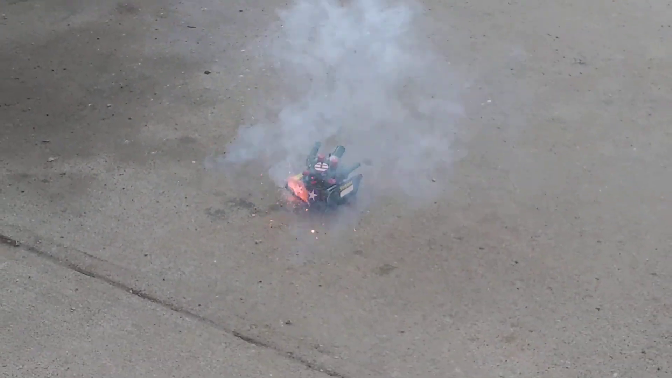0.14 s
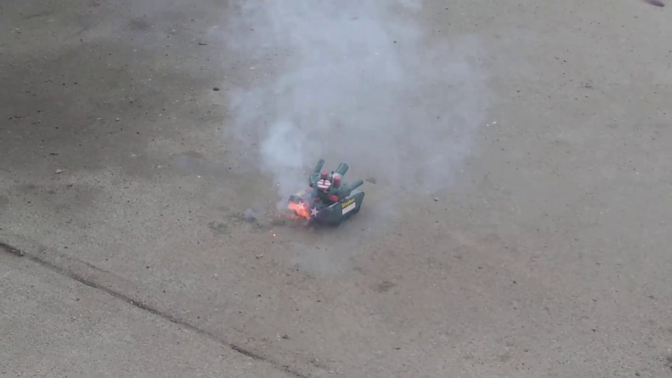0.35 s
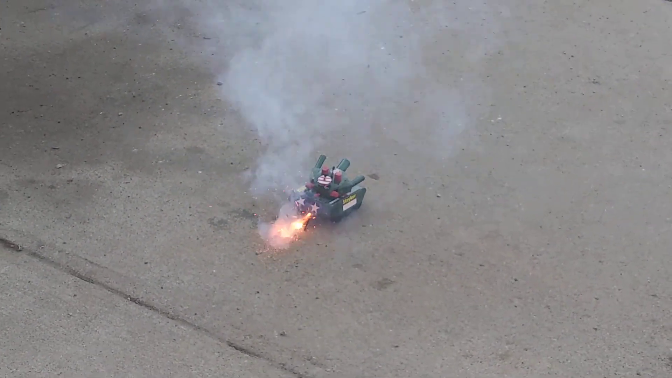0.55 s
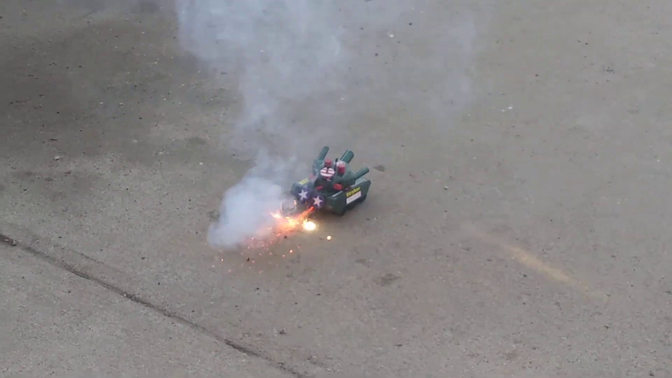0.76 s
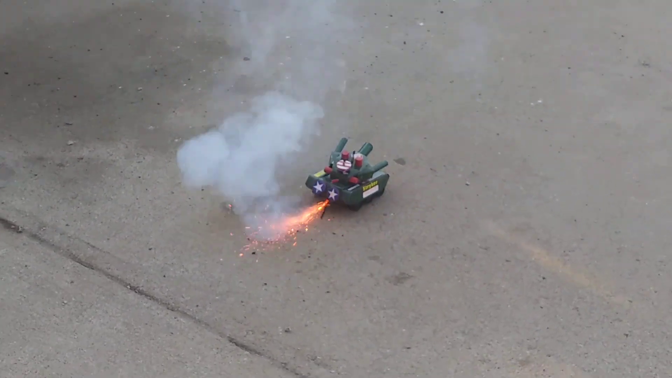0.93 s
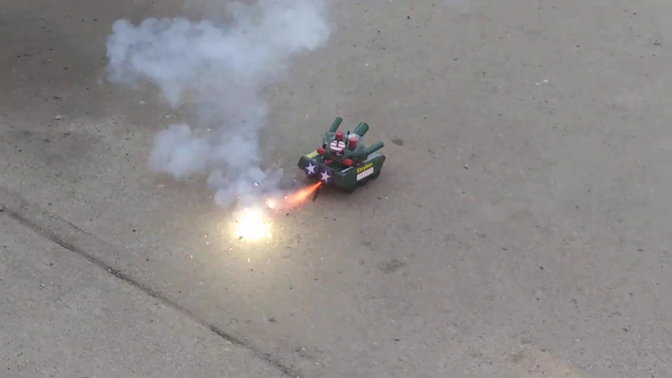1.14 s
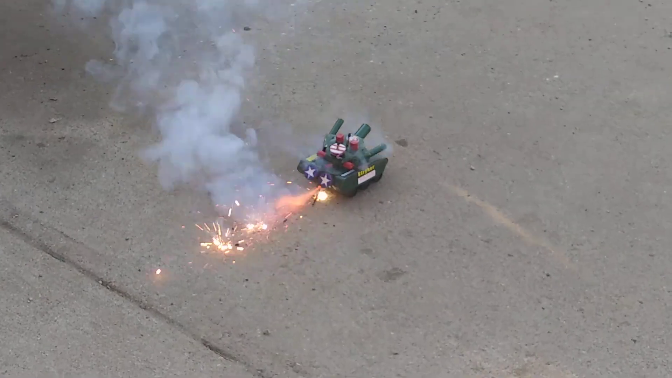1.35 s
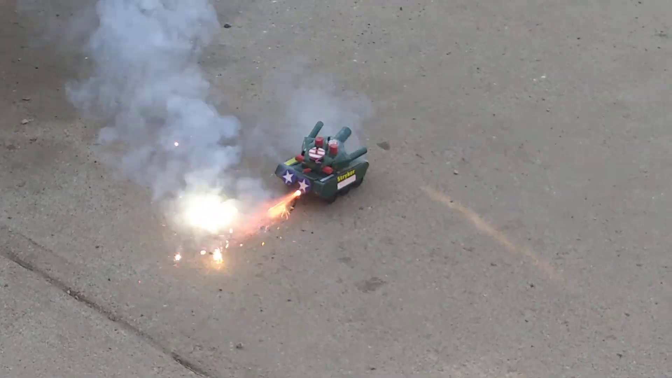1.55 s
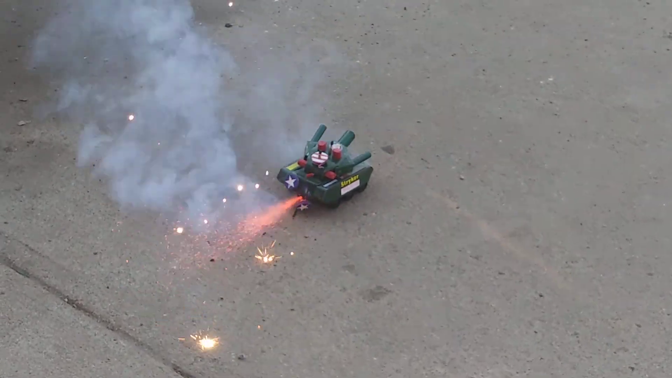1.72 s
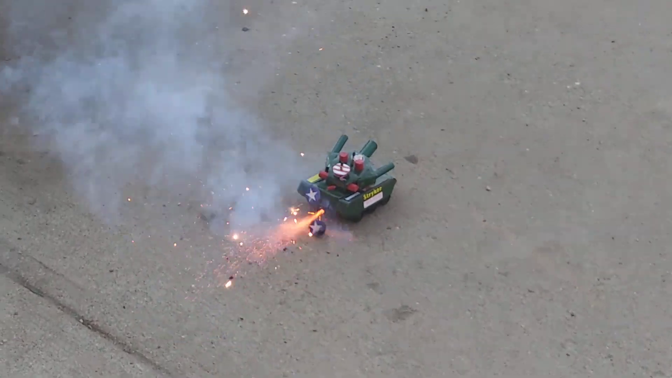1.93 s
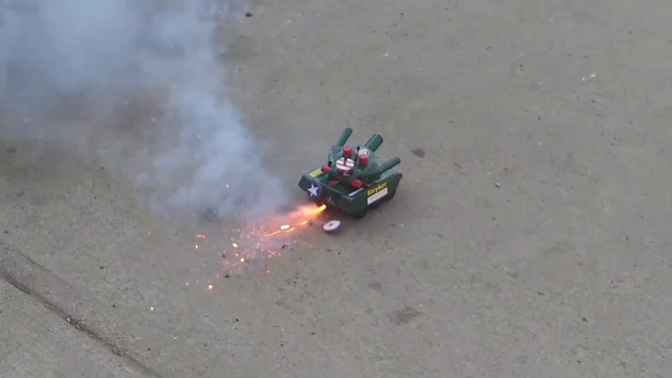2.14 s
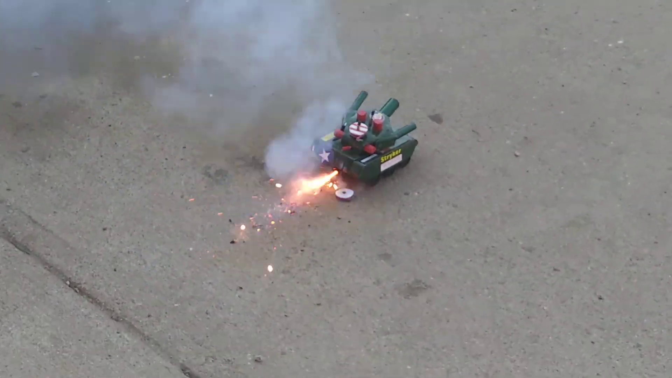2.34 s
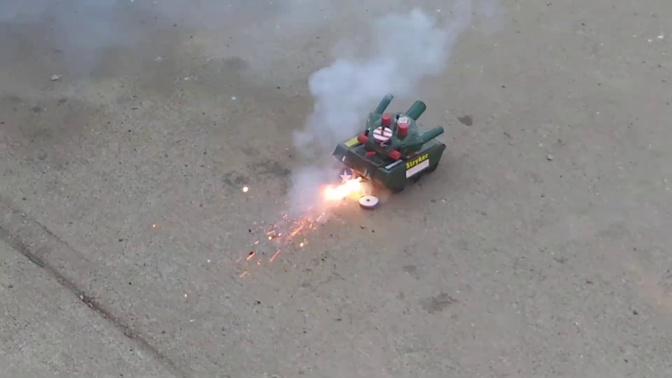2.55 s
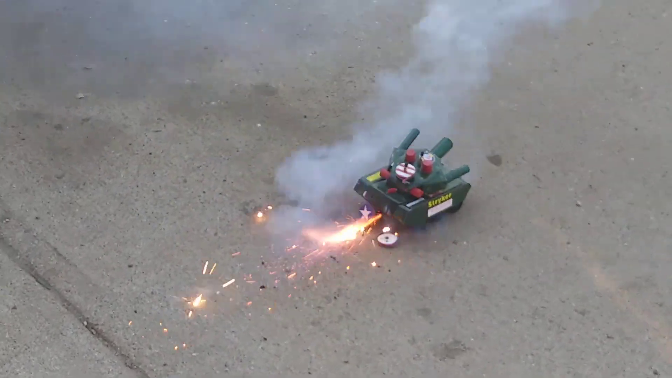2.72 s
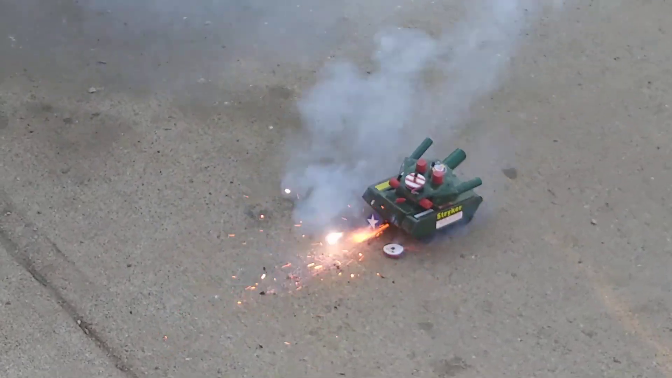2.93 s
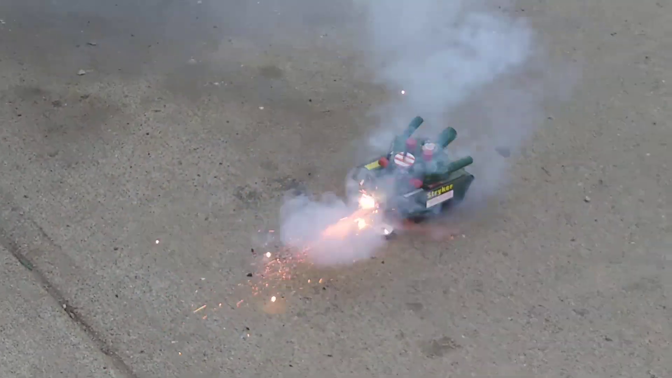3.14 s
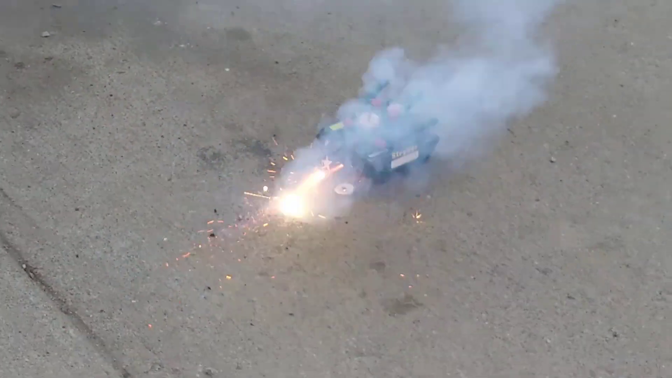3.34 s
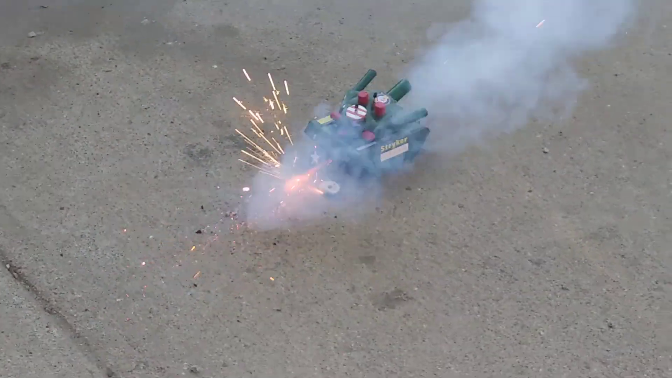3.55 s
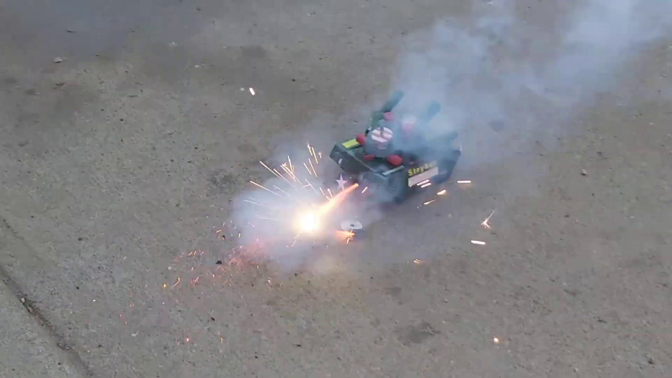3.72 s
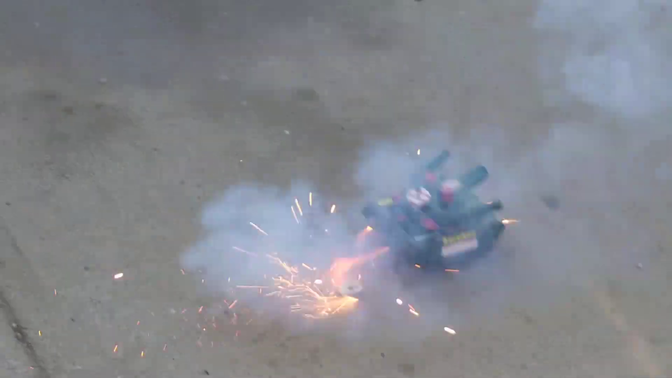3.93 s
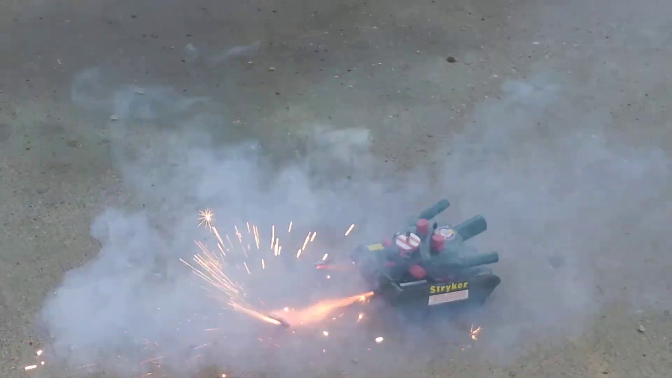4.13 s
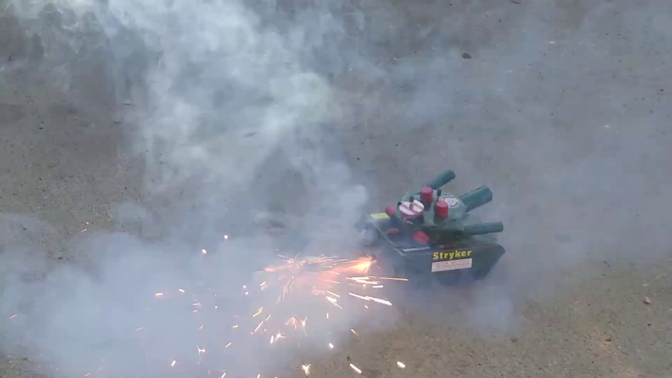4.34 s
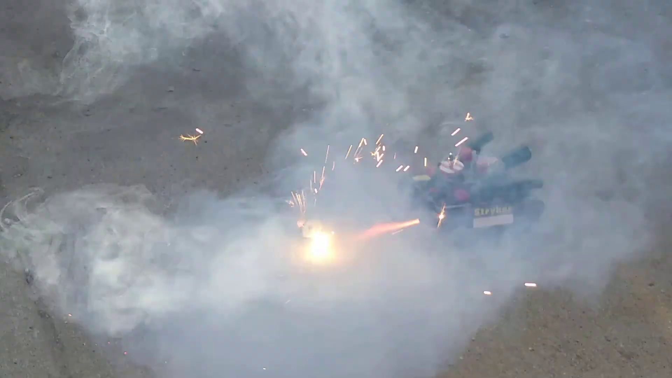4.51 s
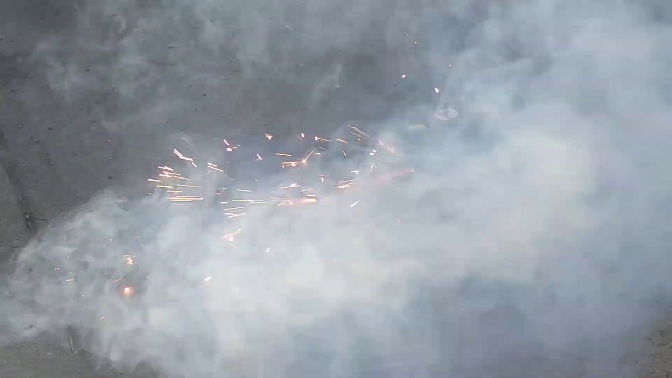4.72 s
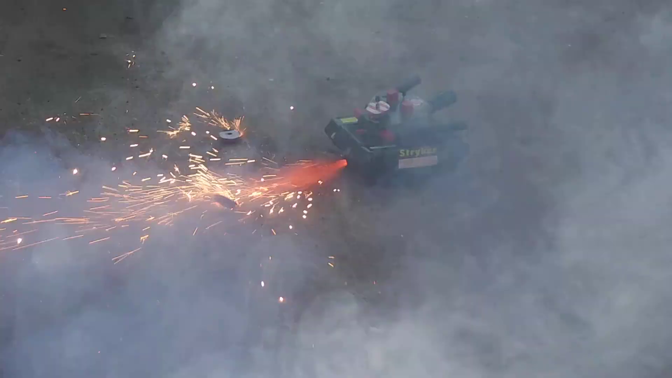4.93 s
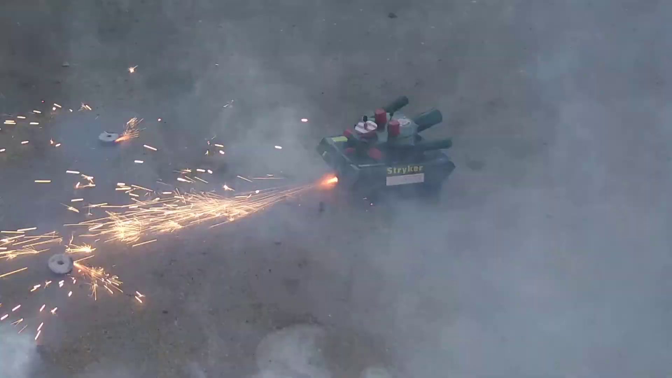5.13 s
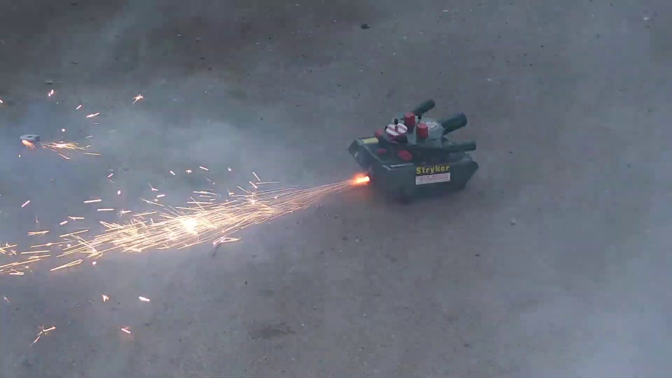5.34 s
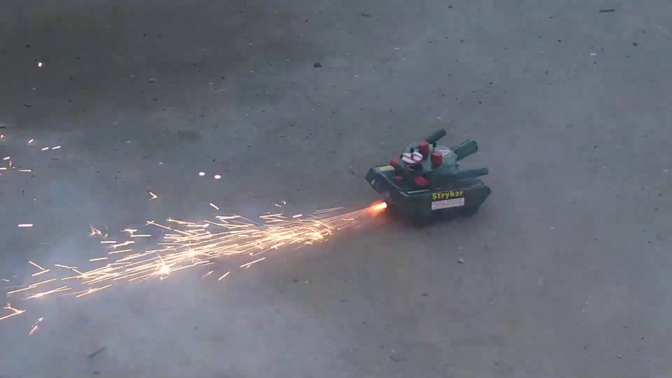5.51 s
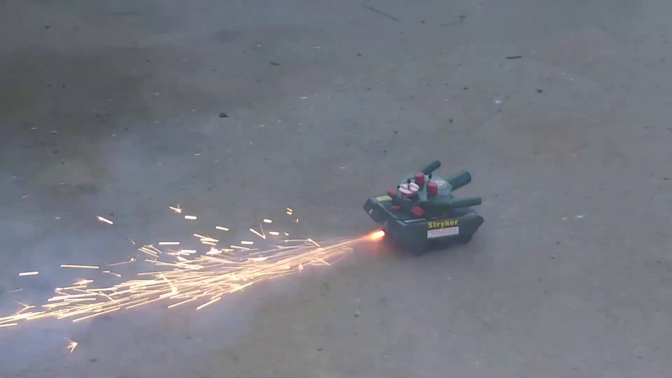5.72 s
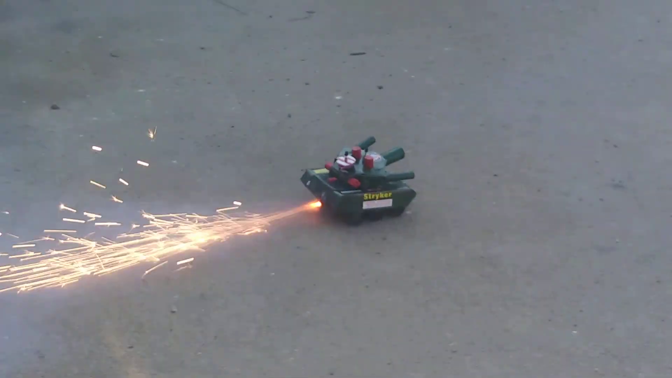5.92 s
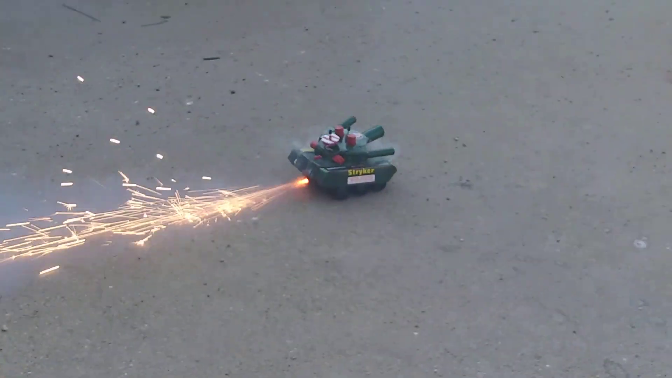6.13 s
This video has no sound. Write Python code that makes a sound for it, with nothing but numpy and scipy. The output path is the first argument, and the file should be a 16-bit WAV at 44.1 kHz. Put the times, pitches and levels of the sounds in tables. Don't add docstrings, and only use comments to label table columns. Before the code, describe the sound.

Outdoors on concrete, burning powder hisses softly and roughly, flickering and ticking with small pops. The flame gets steadily louder and fuller, with dull snaps trailing short hisses. Then a very loud high whistle takes over abruptly, wavering and breaking at first, then raspy and gradually falling in pitch above a sizzling jet, still sounding at the end. One dry handheld microphone, slightly distorted, without echo.

```python
import sys
import numpy as np
from scipy import signal
from scipy.fft import rfft, irfft, next_fast_len
from scipy.io import wavfile
from scipy.ndimage import uniform_filter1d

SR = 44100
rng = np.random.default_rng(int(sys.argv[2]) if len(sys.argv) > 2 else 0)


def output_pcm(signal):
    pcm = np.clip(np.atleast_2d(signal).T, -1, 1) * 32767
    wavfile.write(sys.argv[1], SR, np.round(pcm).astype(np.int16))


def rack_gain(trim_db):
    fader = np.asarray(trim_db, float)
    return 10 ** (fader / 20)


N = 272097

# start_s, level_db
FLAME_LEVEL = [(0.0, -50.5), (0.055, -46), (0.13, -48), (0.17, -42.5), (0.3, -51.5), (0.56, -43.5),
               (1.1, -45), (1.3, -37), (1.8, -40.5), (2.3, -38), (2.5, -35.5), (2.75, -38.5), (3.0, -34),
               (3.5, -33), (3.6, -31.5), (4.55, -31), (4.765, -23.5), (4.79, -37)]
# pitch_hz, level_db (per Hz)
ROAR_COLOUR = [(250, -27), (400, -14.5), (600, -8.5), (885, -2.5), (1490, 1), (3200, -5), (4160, -16.5),
               (7000, -50)]
# pitch_hz, level_db (per Hz)
FIZZ_COLOUR = [(1530, -94), (2600, -19.5), (3750, 3), (5230, 6.5), (6590, -5), (7150, -25), (8500, -57)]
# pitch_hz, level_db (per Hz)
TOP_COLOUR = [(6000, -76), (7000, 25), (7700, 19.5), (8600, 13), (9400, 4.5), (10200, 11), (13700, 9.5),
              (16000, 2)]
# pitch_hz, level_db (per Hz)
PUFF_COLOUR = [(60, -76), (120, -42), (190, -22.5), (300, -5.5), (480, -2), (750, -6), (1200, -18)]
# start_s, puff_db, fizz_db, top_db (all over the roar), restlessness (0-1)
POWDER_LAYERS = [(0.0, -30, -8, -33, 0.61), (0.24, -46, -6, -41, 0.51), (0.4, -46, -5.5, -27, 0.9),
                 (0.55, -28, -1, -22, 0.74), (0.94, -22.5, -1, -25.5, 0.74), (1.78, -17, 3, -28.5, 0.43),
                 (2.46, -18, 3, -27.5, 0.43), (3.1, -22.5, -3, -30, 0.44), (3.34, -25, -6, -29.5, 0.29),
                 (3.55, -33, 2, -20.5, 0.42), (4.019, -30, -1.5, -27, 0.57), (4.67, -48, 1.5, -31.5, .3),
                 (4.78, -47, 10, -26, 0.34)]
# middle_s, length_s, change_db
LULLS_AND_SURGES = [(0.7, 0.0097, -8.5), (0.92, 0.015, -1), (1.05, 0.0056, -6), (1.72, 0.005, -13),
                    (1.79, 0.014, -3), (2.44, 0.037, -9.5), (2.59, 0.014, 4), (3.15, 0.097, -7),
                    (3.39, 0.043, -4.5), (3.53, 0.029, -3.5), (3.58, 0.031, 1), (3.7, .05, -1.5),
                    (3.92, 0.0067, 1), (4.0, .03, -2.5)]
# start_s, peak_db, hiss_db (after the pop)
FUSE_POPS = [(0.0242, -23, -48), (0.048, -17.5, -13.5), (0.0552, -21, -36), (0.0669, -18.5, -12),
             (0.079, -25, -11), (0.0858, -22, -15), (0.1606, -18.5, -5), (0.1672, -25, -15),
             (0.194, -32.5, 4), (0.2342, -36, -21), (0.2826, -35.5, 1), (0.3772, -36.5, 4),
             (0.4216, -35, -4), (0.4495, -33, -16), (0.4633, -29, -8), (0.484, -26, -21),
             (0.5104, -38, -17), (0.5152, -25, -19), (0.5248, -21, -23), (0.5498, -29, -3),
             (0.6266, -27, -19), (0.673, -22.5, -8), (0.7403, -24, -20), (0.764, -23.5, -7),
             (0.8085, -44, 11), (0.8572, -32, 8)]
# start_s, peak_db, hiss_db (after the pop)
CHARGE_POPS = [(0.9441, -22, -7.5), (0.981, -19.5, -12), (1.019, -20.5, -8.5), (1.061, -22, -25),
               (1.0672, -19.5, -14), (1.0998, -21.5, -4), (1.1395, -20, -2), (1.202, -18, -28),
               (1.2393, -19.5, -5), (1.3268, -23, -23), (1.3846, -18, -6.5), (1.509, -19.5, -9),
               (1.587, -18, -20.5), (1.6352, -15, -18.5), (1.745, -17.5, -10), (2.0004, -17.5, -10),
               (2.1084, -17.5, -5.5), (2.1587, -20.5, -7), (2.393, -17, -16), (2.657, -13, -4.5),
               (2.691, -21.5, 0.5), (2.774, -12.5, -7.5), (3.096, -16.5, -24), (3.1694, -26.5, 6),
               (3.35, -14, -27), (3.8248, -16.5, 6), (3.918, -9.5, -20), (4.1371, -22.5, -18),
               (4.195, -15.5, -0.5), (4.2697, -13.5, -5)]
# middle_s, level_db
GULPS = [
    (1.475, -64),
    (1.7, -63),
]
# start_s, pitch_hz, tone_db, steepness_db (octave under tone), unevenness_db (half tone)
CATCHING_TONE = [
    (4.74, 4000, -25, -35, -55),
    (4.764, 3990, -19, -38, -55),
    (4.773, 3960, -10.5, -37, -55),
    (4.781, 3980, -24, -40, -55),
    (4.789, 3925, -11, -26, -55),
    (4.83, 3840, -11.5, -13, -55),
    (4.852, 3850, -11.5, -13, -45),
    (4.859, 3760, -13, -11, -25),
    (4.893, 3735, -14, -11, -25),
]
LASTING_TONE = [
    (4.9, 4070, -16.5, -19, -26),
    (5.03, 3935, -19, -16, -22.5),
    (5.06, 3903, -13.5, -18, -25),
    (5.18, 3797, -14, -15.5, -26.5),
    (5.3, 3705, -14.5, -12, -29),
    (5.46, 3570, -15, -12, -27),
    (5.72, 3513, -13.5, -12.5, -26.5),
    (5.82, 3480, -15, -9.5, -29.5),
    (6.17, 3387, -17, -8, -30.5),
]
# multiple (of the pitch), level_db (under the three-half tone)
HIGH_HALF_TONES = [(5 / 2, -13), (7 / 2, -14.5)]
# middle_s, length_s, change_db
TONE_BREAKS = [
    (4.854, .002, -4),
    (4.879, .002, -9),
    (4.894, .002, -7),
]
# jet_db, slips (0-1)
PULSE_SLIPS = [(-27, 0.), (-21, .95)]
# start_s, level_db
JET_LEVEL = [(4.74, -30), (4.818, -36.5), (4.895, -21), (4.91, -20), (5.1, -22.5), (5.3, -25.5),
             (5.76, -27), (5.83, -21.5), (6.17, -19)]
# pitch_hz, level_db (per Hz)
GAS_COLOUR = [(15, -8.5), (60, -20), (200, -24), (500, -12), (900, -5), (2200, -4), (4500, -9),
              (6500, -24.5)]
# pitch_hz, level_db (per Hz)
SIZZLE_COLOUR = [(3000, -2), (5000, -6.5), (8000, -4), (12000, -4), (16000, -5)]
# middle_s, length_s, change_db
SPURTS = [
    (5.404, 0.014, 6.5),
    (5.474, 0.02, 5),
]
# pitch_hz, width_hz, level_db
COUGH = [(843, 360, -20)]
# pitch_hz, width_hz, change_db
HOUSING_DIPS = [(7200, 220, -16), (9500, 400, -13)]
# middle_s, low_hz, high_hz, level_db
SIDE_NOISES = [(4.547, 6150, 7600, -56), (5.105, 9500, 15300, -33), (5.154, 4650, 5860, -33),
               (5.152, 6800, 8800, -33), (5.268, 4294, 7950, -25), (5.268, 8800, 10500, -42),
               (5.268, 11600, 15300, -36), (5.339, 3970, 8980, -35), (5.804, 5536, 7000, -44),
               (5.803, 8890, 11800, -33), (5.826, 8900, 10400, -44)]

JET_LIT_S = 4.762


def evened(x):
    return x / np.sqrt(np.mean(x ** 2) + 1e-20)


def coloured(x, points):
    pitch_hz, level_db = np.transpose(points)
    hz = abs(np.fft.fftfreq(4096, 1 / SR))
    log_gain = np.interp(np.log(hz + 1), np.log(pitch_hz), level_db, -90, -90) * np.log(10) / 20
    kernel = np.fft.ifft(np.exp(np.conj(signal.hilbert(log_gain)))).real[:2048]
    return signal.oaconvolve(x, kernel / np.linalg.norm(kernel))[:len(x)]


def columns(rows):
    s, *rest = np.transpose(rows)
    t = np.arange(N) / SR
    inside = uniform_filter1d(1. * (t >= s[0]) * (t <= s[-1]), 88)
    return inside, *(np.interp(t, np.maximum.accumulate(s), c) for c in rest)


def bumps(rows):
    t = np.arange(N) / SR
    return sum(db * np.exp(-((t - s) / length) ** 2) for s, length, db in rows)


def drift(hz):
    return evened(signal.sosfilt(signal.butter(2, hz, fs=SR, output="sos"), rng.standard_normal(N)))


def whistle():
    inside, hz, tone_db, steep_db, half_db = columns(CATCHING_TONE + LASTING_TONE)
    octave_db = tone_db + steep_db
    twelfth_db = tone_db + 1.56 * steep_db - 0.5
    three_half_db = half_db + 2
    slips = np.interp(columns(JET_LEVEL)[1], *np.transpose(PULSE_SLIPS))
    shake = np.where(np.arange(N) / SR < LASTING_TONE[0][0], 2.2, 1)
    wander = 1 + 0.00333 * shake * drift(74) + 0.011 * drift(607)
    phase = 2 * np.pi * np.cumsum(hz * wander) / SR
    loose = np.clip((-15 - tone_db) / 4 * (half_db < -45), 0, 1)
    wobble_db = np.interp(half_db, [-50, -25], [.3, 1.3])
    tone = rack_gain(tone_db + bumps(TONE_BREAKS) + 1.5 + wobble_db * drift(150)) * np.cos(phase)
    tone *= 1 - loose + loose * drift(430)
    octave = rack_gain(octave_db + 0.8 + 3.0 * drift(60)) * np.cos(2 * phase + 0.89)
    upper = np.cos(3 * phase + 2.6) + rack_gain(-10) * np.cos(4 * phase + 3.5)
    upper *= rack_gain(twelfth_db + 1.6 + 1.5 * drift(300))
    alternation = np.tanh(1.52 * (2.03 * (1 - np.clip(slips, 0, 1)) + drift(156)))
    half = rack_gain(half_db + 5.0) * np.cos(phase / 2 + np.pi / 2)
    high_halves = sum(rack_gain(db) * np.cos(k * phase) for k, db in HIGH_HALF_TONES)
    high_halves = rack_gain(three_half_db + 3.0) * (np.cos(3 * phase / 2 - 1.4) + high_halves)
    tube = np.sqrt(2) * inside * (tone + octave + upper + alternation * (half + high_halves))
    return signal.sosfilt(signal.butter(4, 250, "high", fs=SR, output="sos"), tube)


def jet():
    t = np.arange(N) / SR
    level_db = columns(JET_LEVEL)[1]
    young = np.clip(1 - (t - JET_LIT_S) / 0.079, 0, 1)
    sizzle_db = 6.5 - 34 * young - 0.55 * (level_db + 26.5) * (1 - young)
    gas = rng.standard_normal(N) * rack_gain(1.37 * drift(63))
    rush = coloured(gas, GAS_COLOUR) + rack_gain(sizzle_db - 16.5) * coloured(gas, SIZZLE_COLOUR)
    return (t > JET_LIT_S) * rack_gain(level_db + bumps(SPURTS) + 4.0) * rush


def cough():
    hz, width, db = COUGH[0]
    start, end = 4.9, 5.05
    t = np.arange(N) / SR
    fade = np.interp(t, [start - .01, start + .02, end - .06, end + .04], [0, 1, 1, 0])
    return rack_gain(db) * np.sqrt(2) * drift(width / 2) * np.cos(2 * np.pi * hz * t) * fade


def sputter(per_s, spread_db, decay_s, share):
    flares = rack_gain(spread_db * np.minimum(rng.exponential(1, N), 1.5)) * (rng.random(N) < per_s / SR)
    dying = signal.lfilter([1], [1, -np.exp(-1 / (decay_s * SR))], flares)
    flicker = uniform_filter1d(dying, 130)
    return evened(1 - share + share * flicker / flicker.mean())


def burn():
    t = np.arange(N) / SR
    lull_db = bumps(LULLS_AND_SURGES)
    body_db = columns(FLAME_LEVEL)[1] + lull_db
    starts, *mix = np.transpose(POWDER_LAYERS)
    stage = np.maximum(np.searchsorted(starts, t, "right") - 1, 0)
    blend = round(0.015 * SR)
    puff_db, fizz_db, top_db, restless = (uniform_filter1d(c[stage], blend) for c in mix)
    crackle = rack_gain(6.6 * np.minimum(rng.exponential(1, N), 3)) * (rng.random(N) < 350 / SR)
    crackle = crackle * rng.choice([-1, 1], N)
    shared = sputter(70, 0.75, 0.0059, np.clip(0.43 * restless, 0, 1)) * rng.standard_normal(N)
    low = shared * sputter(170, 6.0, 0.0025, 0.11 * restless) + rack_gain(-7) * evened(crackle)
    high = shared * sputter(110, 3.5, 0.004, np.clip(0.36 * restless, 0, 1))
    layers = coloured(low, ROAR_COLOUR) + rack_gain(puff_db + 6.5) * coloured(low, PUFF_COLOUR)
    sparks = rack_gain(fizz_db - 5.4) * coloured(shared, FIZZ_COLOUR)
    sparks += rack_gain(top_db + 8.0) * coloured(high, TOP_COLOUR)
    layers += rack_gain(-.6 * lull_db) * sparks
    drowned_db = -150 * np.maximum(t - FLAME_LEVEL[-1][0] - .02, 0)
    return rack_gain(body_db - 0.16 + drowned_db) * layers


def small_spits():
    count = 100
    when, size, hiss = rng.random((count, 3)).T
    s = .9 + 3.75 * (np.arange(count) + when) ** 1.25 / count ** 1.25
    peak_db = np.interp(s, *np.transpose(FLAME_LEVEL)) + 15.5 - 2.5 * size
    return list(zip(s, peak_db, -29 + 8 * (hiss - .5)))


def spits():
    length = 2205
    pops, low, high = np.zeros((3, N + length))
    t = np.arange(length) / SR
    late = t - .001
    rows = FUSE_POPS + CHARGE_POPS + small_spits()
    puffs = rng.standard_normal((len(rows), length))
    chances = rng.random((len(rows), 3))
    for (s, db, hiss_db), puff, (a, b, c) in zip(rows, puffs, chances):
        at = round((s - .001) * SR)
        wave = np.cos(2 * np.pi * (950 + 800 * a) * late + 1.8 * (b - .5))
        pops[at:at + length] += rack_gain(db - 2.5) * wave * np.exp(-(late / 0.0004) ** 2)
        dying = puff * rack_gain(db - 60 * t / (0.0074 + 0.03 * c)) * np.minimum(t / 0.0018, 1)
        low[at:at + length] += dying
        high[at:at + length] += dying * rack_gain(hiss_db)
    body = rack_gain(-13.5) * (coloured(low, ROAR_COLOUR) + rack_gain(-4.5) * coloured(low, PUFF_COLOUR))
    hiss = rack_gain(-6.5) * (coloured(high, FIZZ_COLOUR) + rack_gain(-14.5) * coloured(high, TOP_COLOUR))
    pops = signal.sosfilt(signal.butter(4, 260, "high", fs=SR, output="sos"), pops)
    return (pops + body + hiss)[:N]


def thumps():
    hz, length_s = 200, .035
    t = np.arange(N) / SR
    deep = np.sqrt(2) * drift(hz / 2) * np.cos(2 * np.pi * hz * t)
    deep = signal.sosfilt(signal.butter(4, 90, "high", fs=SR, output="sos"), deep)
    return deep * sum(rack_gain(db) * np.exp(-((t - s) / length_s) ** 2) for s, db in GULPS)


def scene():
    mono = burn() + spits() + jet() + whistle() + cough() + thumps()
    return np.array([mono, mono])


def side_noise():
    side = np.zeros(N)
    window = np.sin(np.pi * np.arange(2048) / 2048)
    noises = rng.standard_normal((len(SIDE_NOISES), 2048))
    for (s, low_hz, high_hz, db), noise in zip(SIDE_NOISES, noises):
        band = signal.sosfiltfilt(signal.butter(8, [low_hz, high_hz], "band", fs=SR, output="sos"), noise)
        side[round(s * SR) - 1024:][:2048] += rack_gain(db) * evened(band) * window
    return np.array([side, -side])


def band_limit(x):
    return signal.sosfilt(signal.butter(12, 17110, fs=SR, output="sos"), x)


def record(dry):
    size = next_fast_len(N + SR // 2)
    hz = np.fft.rfftfreq(size, 1 / SR)
    dips_db = sum(db / (1 + (2 * (hz - f) / width) ** 2) for f, width, db in HOUSING_DIPS)
    x = irfft(rfft(dry, size) * rack_gain(dips_db), size)[:, :N]
    ceiling, knee = .56, 9
    x = x / (1 + abs(x / ceiling) ** knee) ** (1 / knee)
    treble_cut = signal.firwin(1023, 15740, window=("kaiser", 9), fs=SR)
    x = signal.oaconvolve(x, treble_cut[None], "same")
    return band_limit(x + side_noise())


dry = scene()
out = record(dry)
output_pcm(out)
```